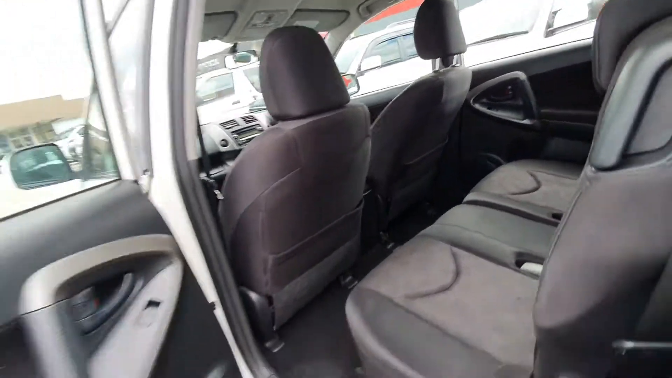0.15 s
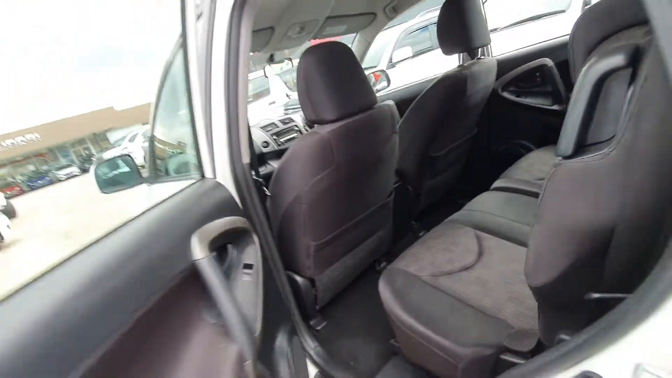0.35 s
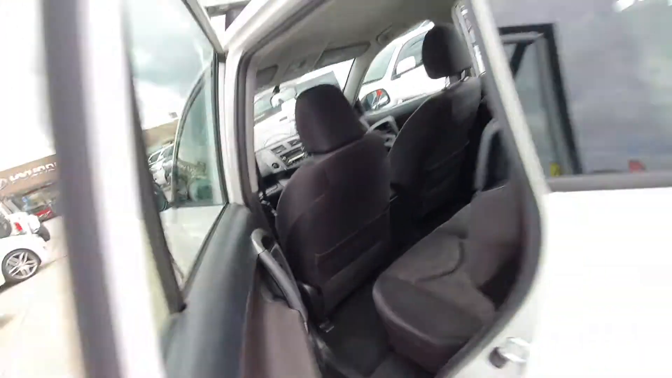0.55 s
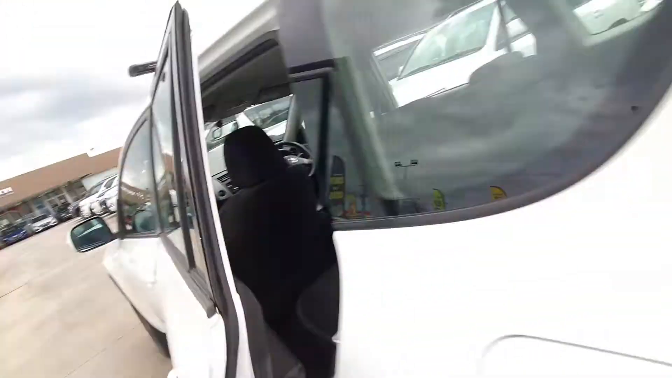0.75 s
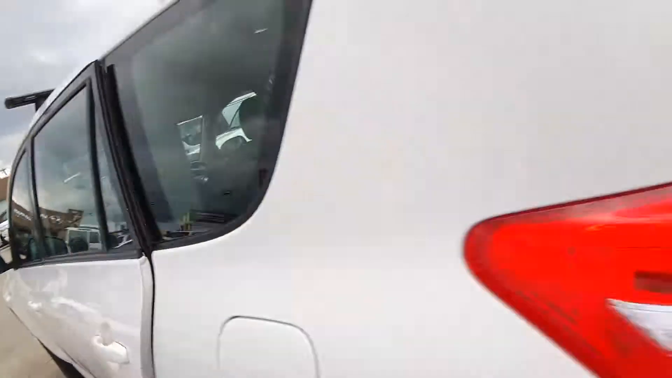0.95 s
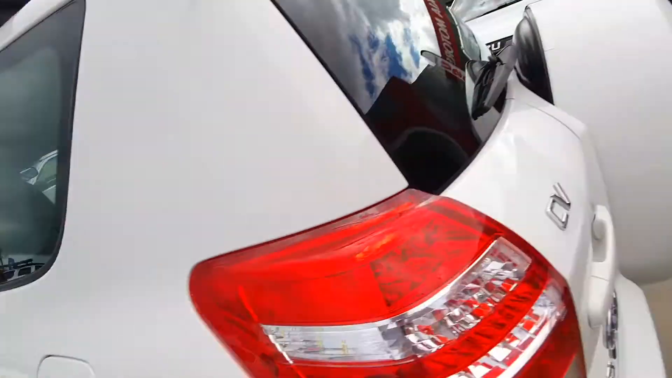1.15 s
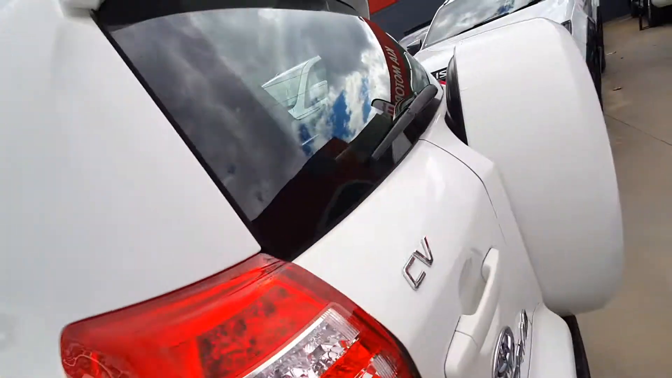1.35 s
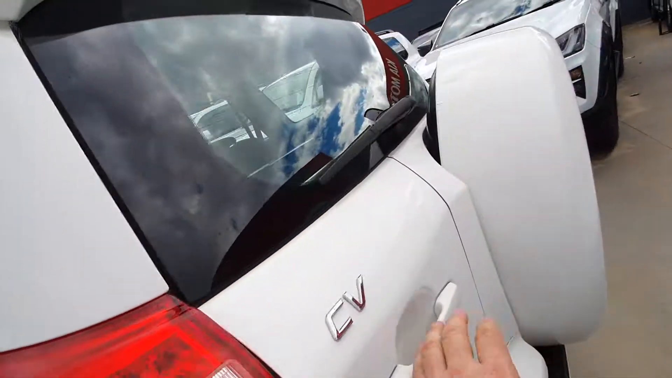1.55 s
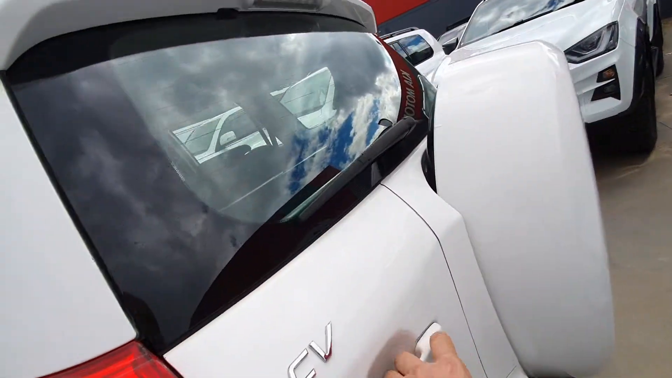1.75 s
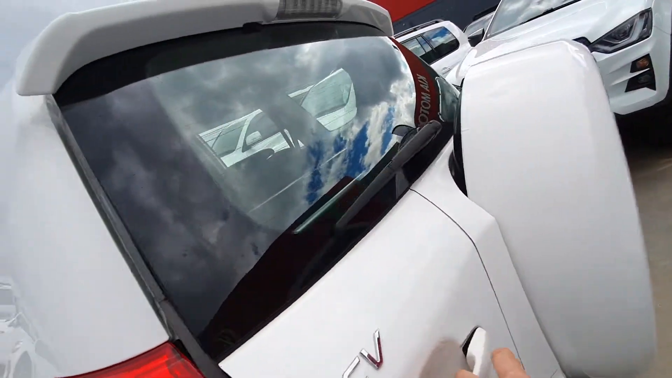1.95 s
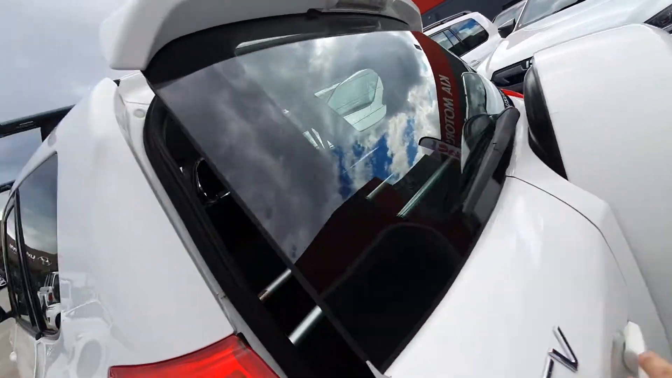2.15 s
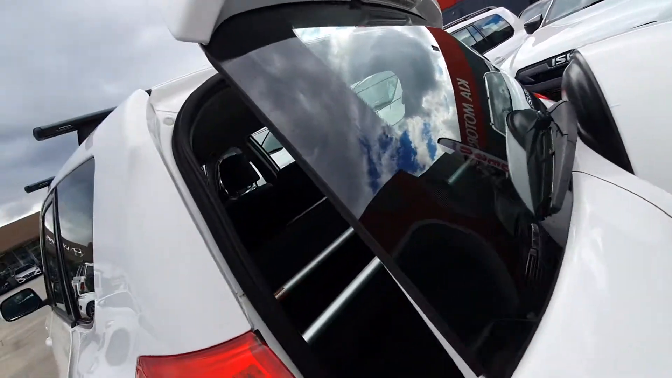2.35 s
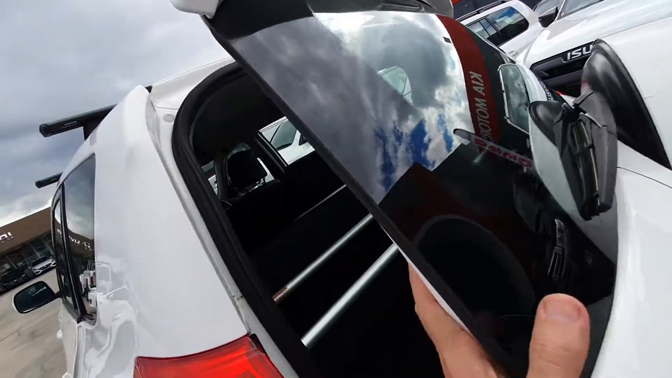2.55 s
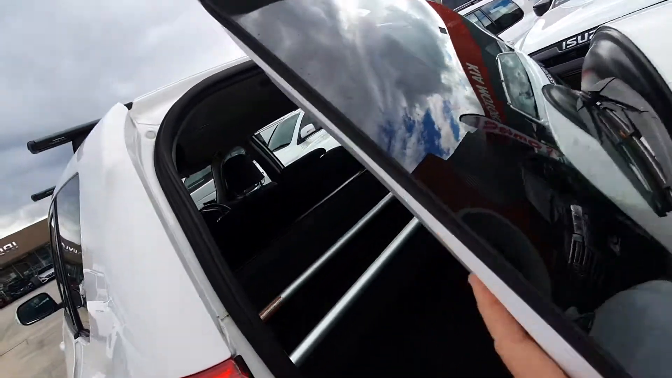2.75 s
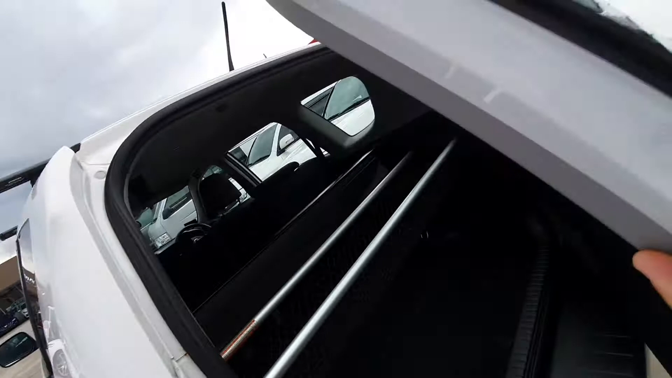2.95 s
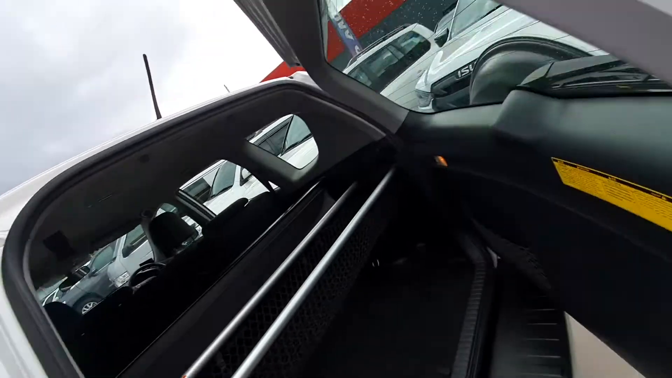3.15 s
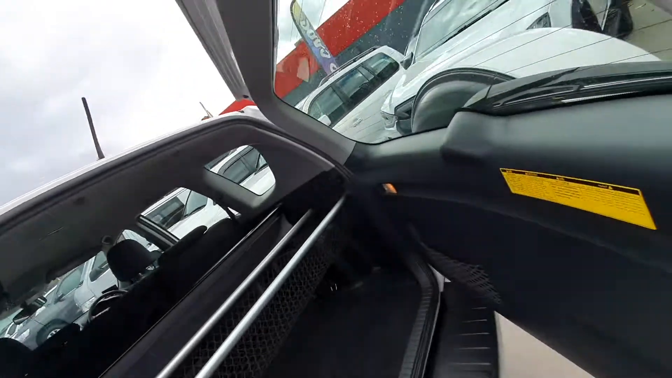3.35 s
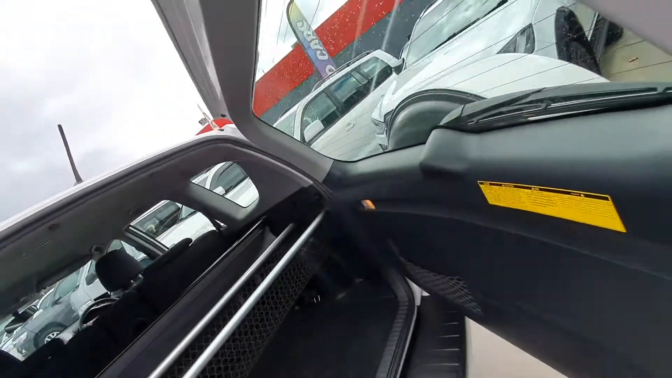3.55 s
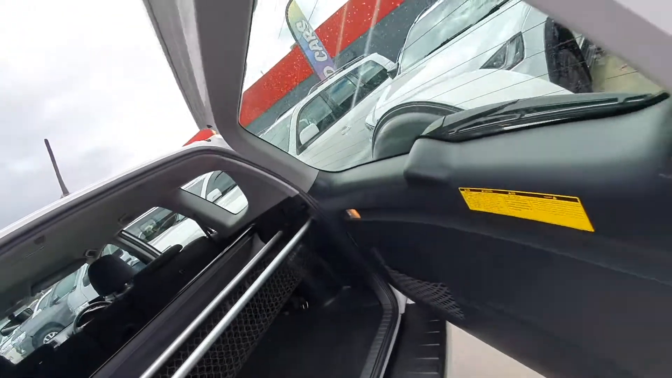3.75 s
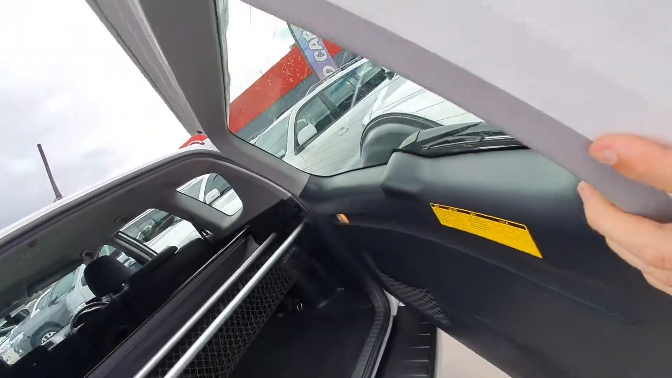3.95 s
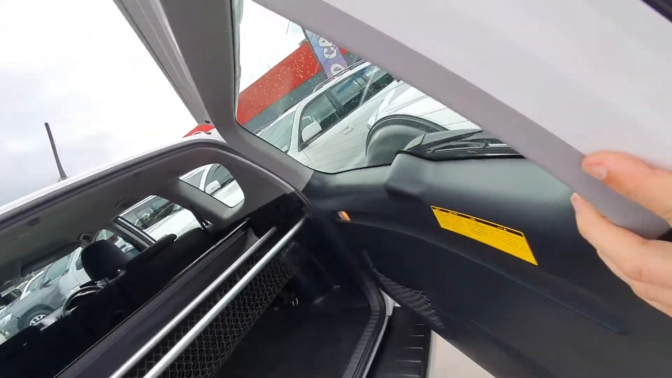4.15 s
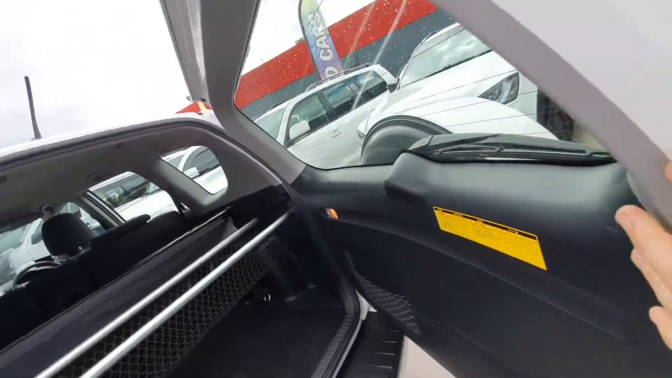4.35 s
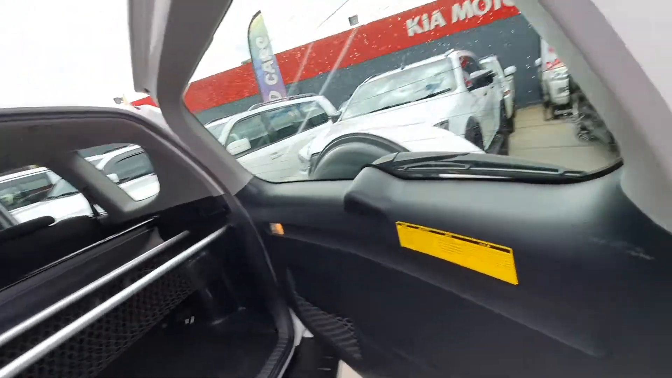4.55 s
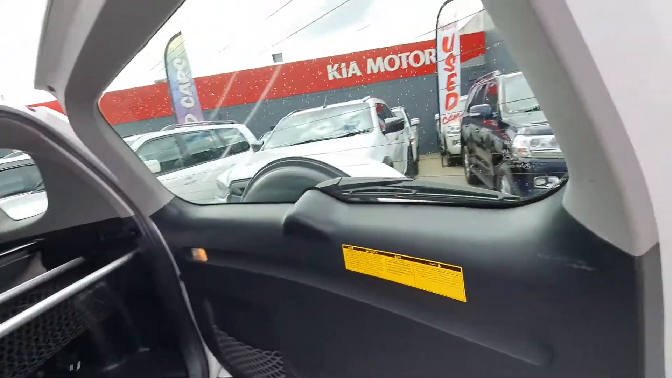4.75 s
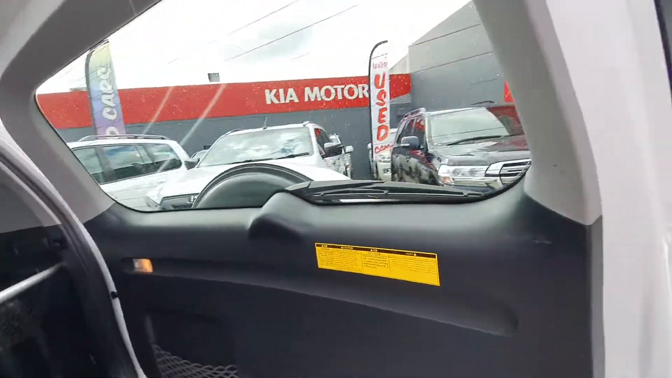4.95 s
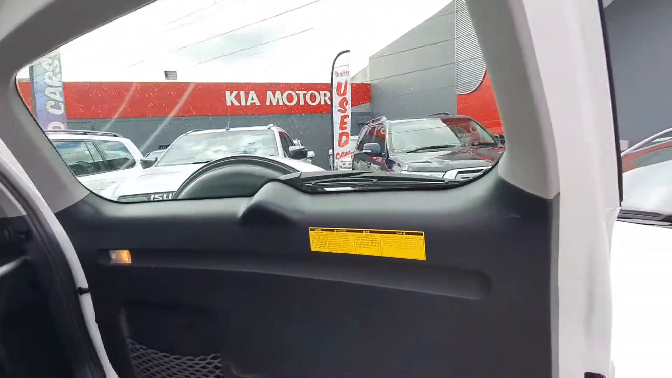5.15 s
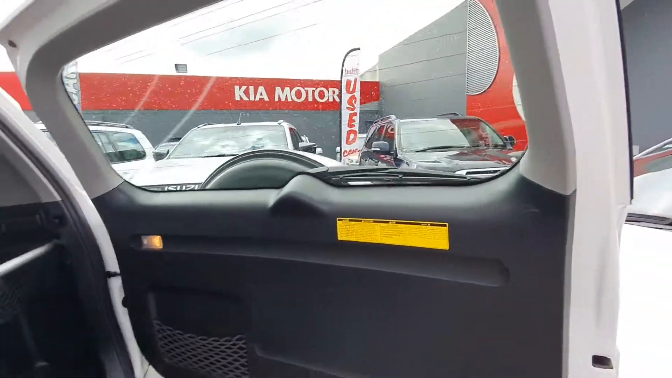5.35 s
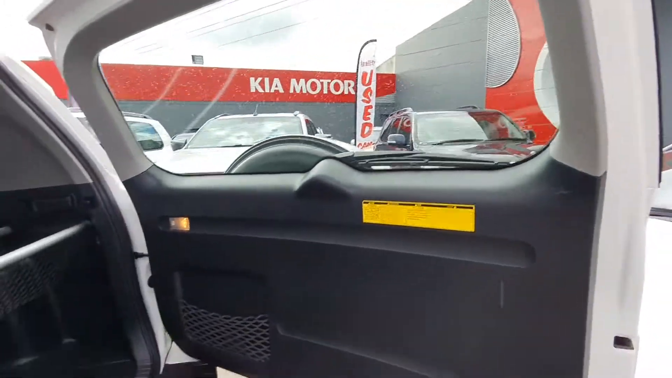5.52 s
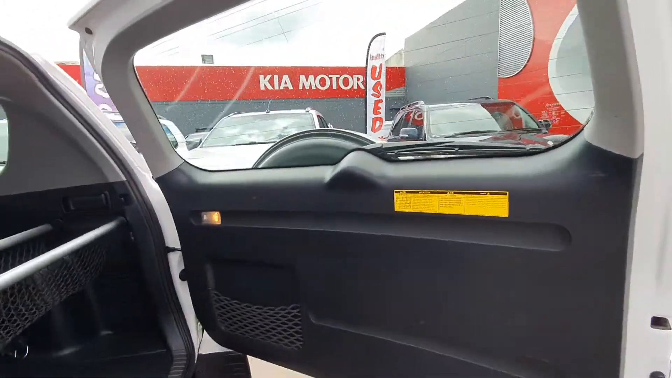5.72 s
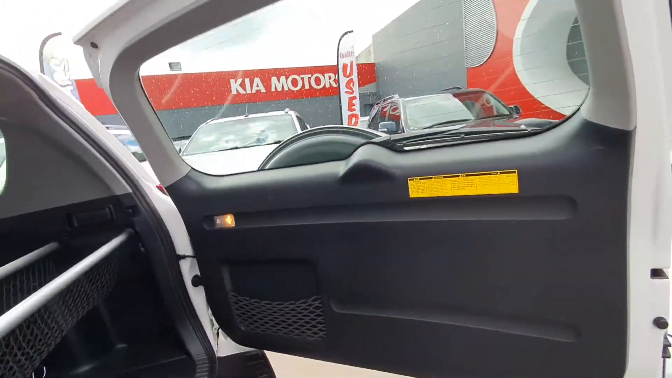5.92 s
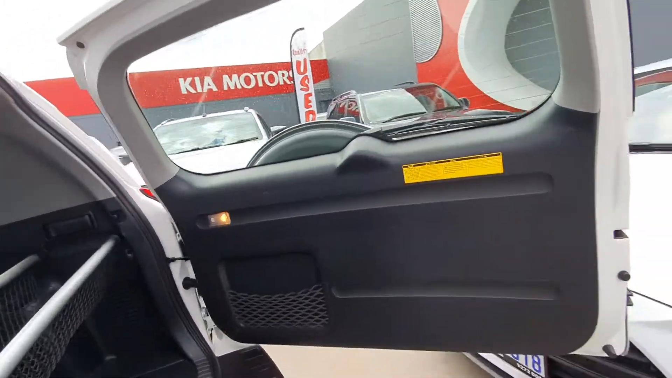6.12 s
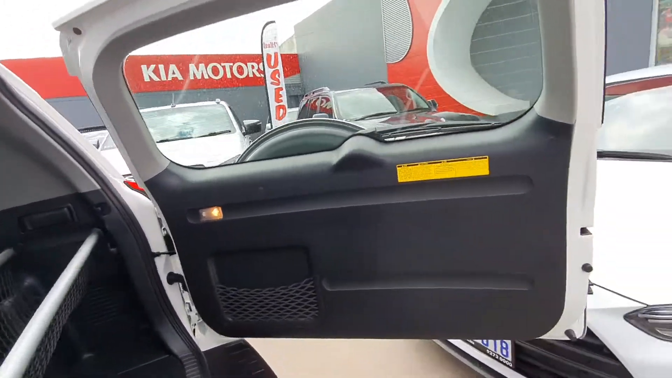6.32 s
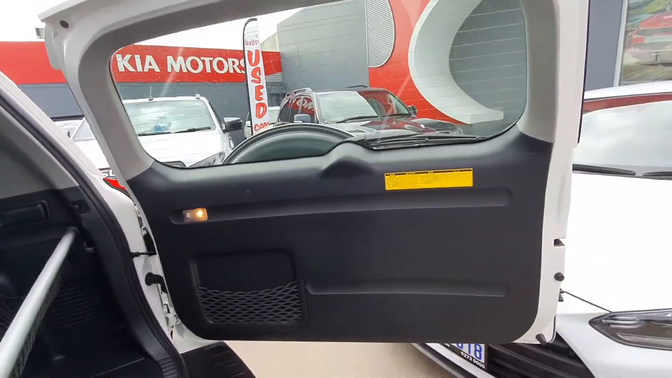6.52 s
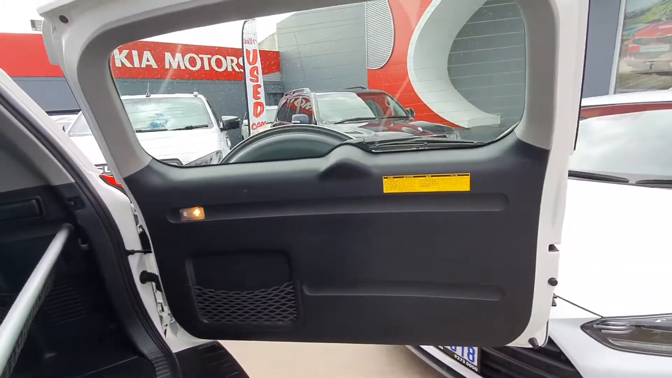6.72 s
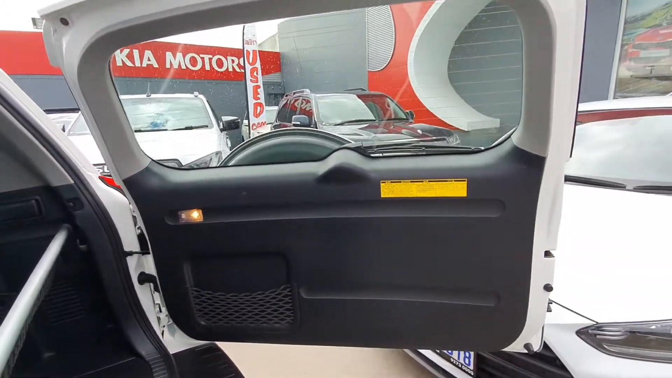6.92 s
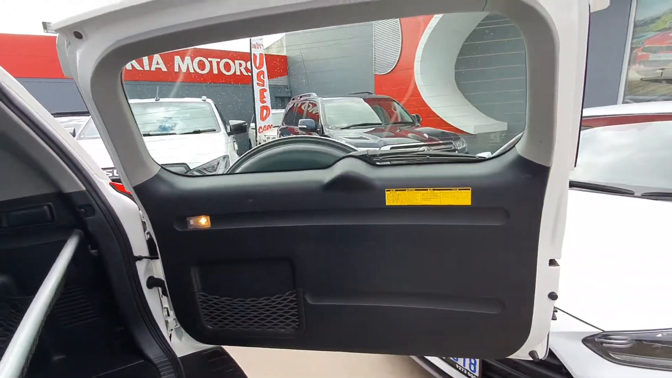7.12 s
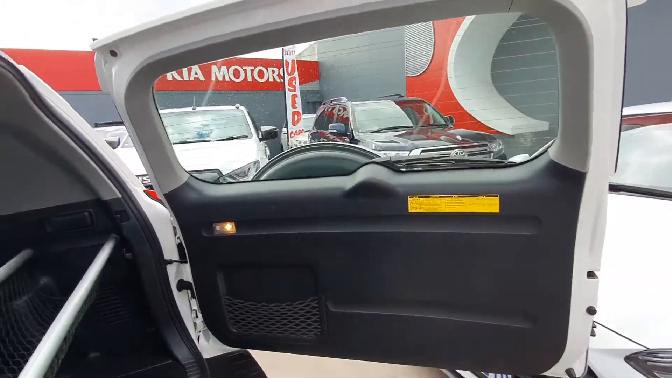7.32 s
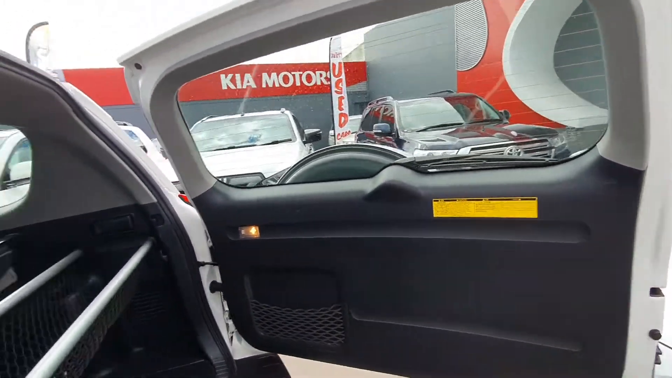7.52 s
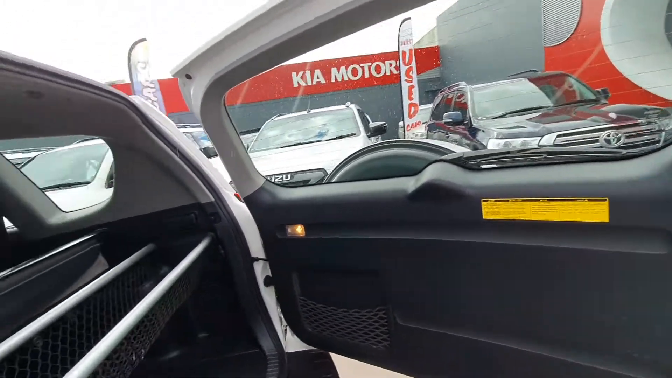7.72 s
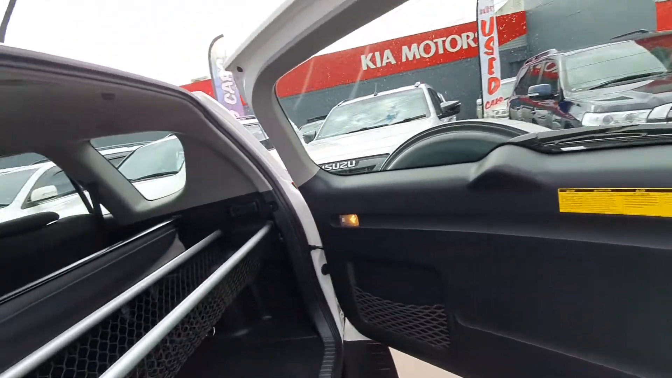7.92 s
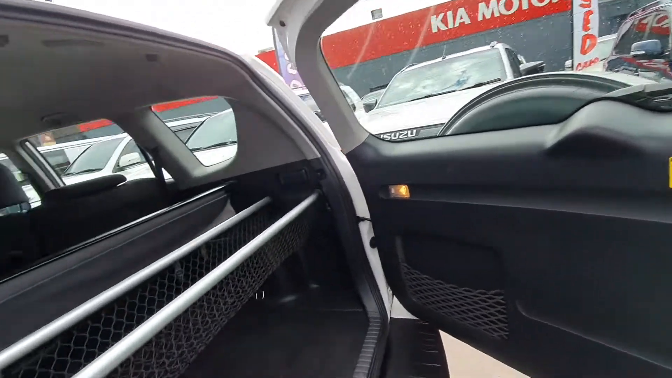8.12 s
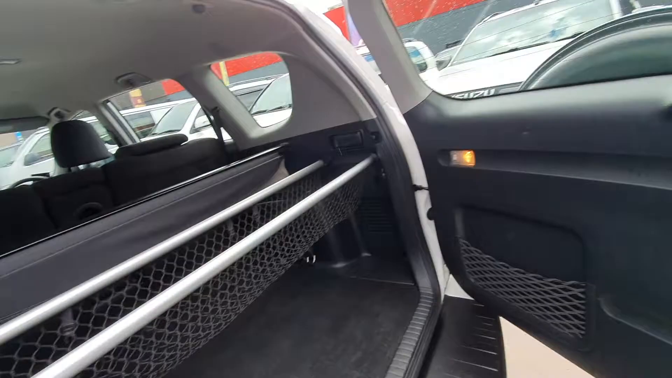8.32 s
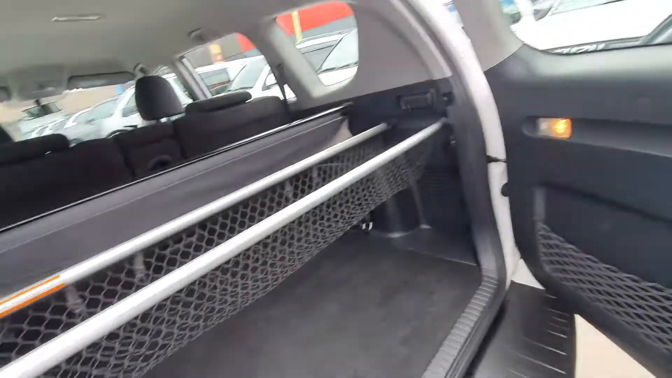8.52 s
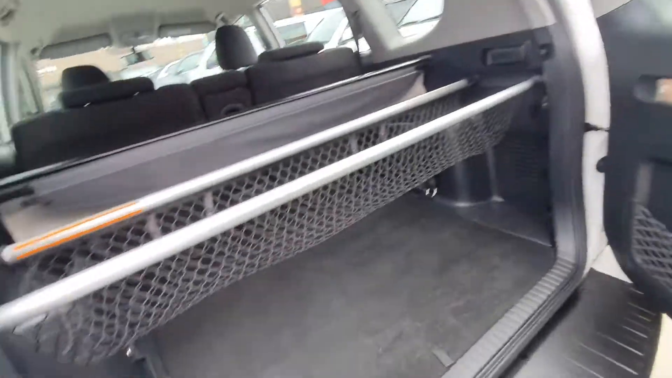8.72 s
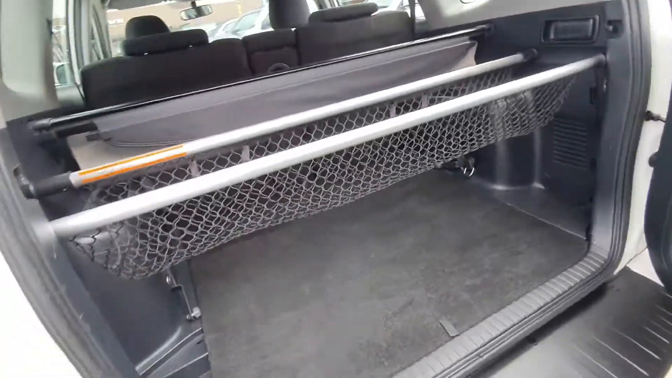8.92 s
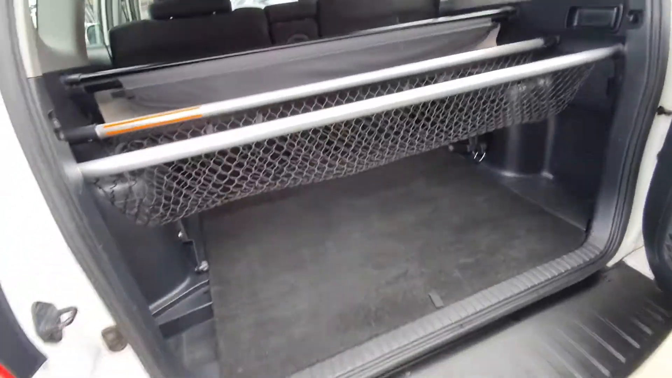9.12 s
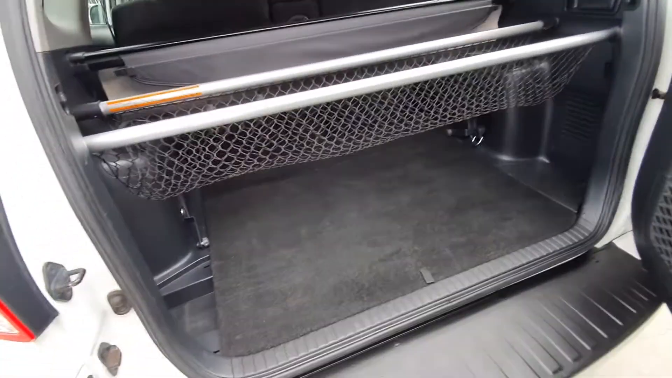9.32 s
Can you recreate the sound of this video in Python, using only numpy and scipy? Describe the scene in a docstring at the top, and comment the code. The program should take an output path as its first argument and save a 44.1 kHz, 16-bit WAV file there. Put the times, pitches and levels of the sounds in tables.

```python
"""Car doors and a tailgate on an open lot

A side door is pushed shut, then a tailgate is unlatched and swung open; another door close by is
opened and slammed. Struck panels are modal resonators over a noise crash, and closing doors boom their cabins.
Shoes and sleeves are shaped friction noise; idling engines and a cooling fan are wavering sines.
Far traffic is banded noise, and the recorder's gain ducks under the loudest blows."""
import sys
import numpy as np
from scipy import signal
from scipy.io import wavfile
from scipy.ndimage import uniform_filter1d

SR = 44100
rng = np.random.default_rng(int(sys.argv[2]) if len(sys.argv) > 2 else 0)


def master(y):
    """Save y as 16-bit WAV."""
    cut = np.clip(np.atleast_2d(y).T, -1, 1)
    pcm = np.round(cut * 32767)  # scale
    wavfile.write(sys.argv[1], SR, pcm.astype(np.int16))


N = 413216
TIME = np.arange(N) / SR   # seconds
EDGES = 22 * 2 ** np.arange(0, 9.6, .5)   # half-octave band edges, Hz


def from_db(db):
    """Logarithmic level: decibels to an amplitude gain."""
    return 10 ** (np.asarray(db) / 20)


def rms_one(x):
    """Power normalisation: scale to rms 1."""
    return x / np.sqrt(np.mean(x ** 2) + 1e-20)


def level_at_times(rows):
    """Linear interpolation: a level curve read at every sample."""
    s, db = np.transpose(rows)
    return np.interp(TIME, s, db)


def at_hz(points, hz):
    """Logarithmic pitch: a spectrum interpolated on a log-frequency axis."""
    table_hz, values = np.transpose(points)
    return np.interp(np.log(hz), np.log(table_hz), values)


def add(out, s, sound):
    """Superposition: mix a stereo sound in at s seconds."""
    start = max(round(s * SR), 0)
    out[:, start:start + sound.shape[1]] += sound[:, :N - start]


def drift(count, size=N):
    """Random modulation: joined Gaussian knots, count a second, around 0 with spread 1."""
    knots = rng.standard_normal(size * count // SR + 2)
    return np.interp(np.arange(size) * count / SR, np.arange(len(knots)), knots)


def panned(db):
    """Intensity stereo: left and right gains for a left minus right level in dB."""
    return from_db(np.array([[db], [-db]]) / 2)


def resonance(x, hz, width):
    """Damped resonator: a two-pole band-pass with gain 1 at its peak; hz and width in Hz."""
    r = np.exp(-np.pi * width / SR)
    gain = (1 - r * r) / 2
    return signal.lfilter(gain * np.array([1, 0, -1]), [1, -2 * r * np.cos(2 * np.pi * hz / SR), r * r], x)


# Likeness of the two channels. Each row: frequency in Hz, left-right correlation.
CHANNEL_LIKENESS = [(30, 0.8), (200, 0.95), (400, 0.52), (700, 0.29), (1200, -0.23), (2500, 0.062),
                    (15000, -0.12)]
# Stereo balance of the noise. Each row: frequency in Hz, left minus right level in dB.
NOISE_BALANCE = [(60, -3), (250, -0.5), (600, -1.5), (1200, -3.5), (2200, 3), (4000, -1), (8000, 2.8),
                 (14000, -5.5)]


def noise_bands(size, balance=NOISE_BALANCE):
    """Partial coherence: half-octave noise bands, alike left and right mainly in the bass."""
    run_in = SR // 10   # lets the filters settle
    white = rng.standard_normal((2, 2, size + run_in))
    for k, (low, high) in enumerate(zip(EDGES, EDGES[1:])):
        band_pass = signal.butter(2, [low, high], "band", fs=SR, output="sos")
        mid, side = signal.sosfilt(band_pass, white[k % 2])[:, run_in:]   # neighbours use separate noise
        hz = np.sqrt(low * high)
        alike = np.clip(at_hz(CHANNEL_LIKENESS, hz), -1, 1)
        pair = np.sqrt(1 + alike) * mid + np.sqrt(1 - alike) * np.array([side, -side])
        yield hz, rms_one(pair) * panned(at_hz(balance, hz))


# Spectrum of the far traffic. Each row: frequency in Hz, relative density in dB per Hz.
TRAFFIC_SPECTRUM = [(220, -9), (350, -11), (460, -10.5), (600, -12), (800, -18), (1000, -13.5),
                    (1500, -19.5), (2200, -27.5), (3000, -31.5), (4000, -37.5), (5300, -40.5), (8000, -53),
                    (15000, -67)]


def far_traffic(start_db=-40, fade_db_per_s=0.4947):
    """Incoherent sources: broadband noise that slowly thins out."""
    return TRAFFIC_SPECTRUM, from_db(start_db - fade_db_per_s * TIME)


# Spectrum of the rumble. Each row: frequency in Hz, relative density in dB per Hz.
RUMBLE_SPECTRUM = [(22, -2), (31, 15), (42, 0), (55, 0), (80, 11.5), (110, -10.5), (160, 1), (220, -20),
                   (350, -29)]


def steady_rumble(rumble_db=-36.5):
    """Stationary noise: a low rumble of constant mean level."""
    return RUMBLE_SPECTRUM, from_db(rumble_db)


# Spectrum of the passing vehicle. Each row: frequency in Hz, relative density in dB per Hz.
SWISH_SPECTRUM = [(1100, -13.5), (1700, 20), (2400, 11.5), (3300, -23)]


def passing_vehicle(nearest_s=5, nearest_db=-52, half_s=0.25):
    """Inverse distance law: a far swish is 3 dB down half_s seconds either side of its nearest point."""
    return SWISH_SPECTRUM, from_db(nearest_db) / np.hypot(1, (TIME - nearest_s) / half_s)


# Spectrum of the cloth. Each row: frequency in Hz, relative density in dB per Hz.
CLOTH_SPECTRUM = [(1000, 0.5), (3000, 9.5), (5000, 8), (7000, -0.5), (11000, 2.5), (15000, -11.5)]
# Moves of the walker. Each row: middle in seconds, level in dB before rustle_db, half length in seconds.
WALKER_MOVES = [(0.3, -66, 1), (1.68, -71.5, 0.17), (2.348, -68, 0.41), (3.224, -65.5, 0.15),
                (3.595, -62.5, 0.22), (4.5, -67, 0.37), (5.06, -67, 0.25), (5.882, -66.5, 0.3),
                (6.484, -69, 0.23), (7.945, -70.5, 0.43), (8.653, -68, 0.28), (9.176, -68.5, 0.16)]


def clothes(rustle_db=10.0, crinkle_db=1.5):
    """Friction noise: cloth near the microphone rustles whenever the walker moves, and crinkles quickly."""
    power = sum(from_db(db) ** 2 * np.exp(-((TIME - s) / length) ** 2) for s, db, length in WALKER_MOVES)
    return CLOTH_SPECTRUM, np.sqrt(power) * from_db(rustle_db + crinkle_db * drift(count=120))


def open_air(patchy_db=1.5):
    """Power addition: the noise layers add as powers in each band, with a slow random unevenness."""
    layers = [far_traffic(), steady_rumble(), passing_vehicle(), clothes()]
    centres = np.sqrt(EDGES[1:] * EDGES[:-1])
    shares = []
    for spectrum, _ in layers:
        inside = (centres > spectrum[0][0] / np.sqrt(2)) & (centres < spectrum[-1][0] * np.sqrt(2))
        share = from_db(at_hz(spectrum, centres)) * np.sqrt(centres) * inside   # bandwidth grows with pitch
        shares.append(share / np.linalg.norm(share))
    out = np.zeros((2, N))
    for k, (hz, band) in enumerate(noise_bands(N)):
        power = sum((share[k] * level) ** 2 for share, (_, level) in zip(shares, layers))
        out += np.sqrt(power) * from_db(patchy_db * drift(count=10)) * band
    return out


def tone(hz, db, waver, lag_ms=-0.2, pan_db=-1.0):
    """Phase modulation: a machine tone whose phase wavers (radians) with the load; db is its rms level."""
    phase = 2 * np.pi * (np.cumsum(hz * np.ones(N)) / SR + rng.random()) + waver * drift(count=5)
    apart = np.pi * hz * lag_ms / 10 ** 3   # half the delay between the channels, as phase
    return np.sqrt(2) * from_db(db) * panned(pan_db) * np.array([np.sin(phase - apart), np.sin(phase + apart)])


# Faint steady whines of other machines. Each row: frequency in Hz, mean level in dB.
MACHINE_WHINES = [(549, -57.5), (710, -64.5), (748, -61)]


def whines():
    """Tonal machine noise: faint sines whose levels drift by chance."""
    return sum(tone(hz, db + 3 * drift(count=3), waver=1.5) for hz, db in MACHINE_WHINES)


# Orders of an idling four-cylinder engine. Each row: multiple of the firing rate, mean level in dB.
ENGINE_ORDERS = [(1, -45), (1.5, -64), (2, -45.5), (2.5, -52), (3, -41.5), (4, -60), (5, -45), (6, -59.5)]


def idling_engine(firing_hz=27.44, unsteady_db=1.0):
    """Engine orders: periodic firing sounds at whole and half multiples of its rate."""
    return sum(tone(k * firing_hz, db + unsteady_db * drift(count=4), waver=0.25) for k, db in ENGINE_ORDERS)


# Level of the drone along the walk. Each row: time in seconds, level in dB.
DRONE_LEVEL = [(0, -32.5), (0.9, -32.5), (1.6, -24.5), (2.14, -23.5), (2.28, -38), (2.45, -22), (2.63, -31),
               (2.82, -23), (3.35, -28), (3.65, -36.5), (4.2, -32), (6.2, -40.5), (8.2, -36.5), (8.7, -59),
               (9.37, -35)]


def exhaust_drone(start_hz=72.36, sag_hz_per_s=0.68, step_at_s=7.9, step_hz=7.1, step_s=0.19):
    """Speed-locked pitch: the drone sinks as that engine settles, then steps up."""
    step = step_hz * np.clip((TIME - step_at_s) / step_s, 0, 1)
    return tone(start_hz - sag_hz_per_s * TIME + step, level_at_times(DRONE_LEVEL), waver=0.075)


# Blade tone along the walk. Each row: time in seconds, level in dB before lift_db.
BLADE_LEVEL = [(0, -36), (0.95, -36), (1.45, -52), (2.7, -51.5), (3.15, -43.5), (5.5, -43), (6.4, -55.5),
               (7.4, -49), (8.6, -43), (9.37, -44)]
# Octave of the blade tone. Each row: time in seconds, level in dB.
BLADE_OCTAVE_LEVEL = [(0, -44), (0.55, -49.5), (1.05, -42), (1.7, -51.5), (2.6, -49.5), (3.0, -45.5),
                      (3.4, -50.5), (4.7, -49.5), (5.7, -43.5), (6.7, -59), (8.6, -47), (9.37, -54.5)]


def cooling_fan(blade_hz=177.1, lift_db=1.0):
    """Blade passing: a tone at the blade rate, with its octave wavering more."""
    blade = tone(blade_hz, level_at_times(BLADE_LEVEL) + lift_db, waver=0.19)
    octave = tone(2 * blade_hz, level_at_times(BLADE_OCTAVE_LEVEL), waver=0.98)
    return blade + octave


# Shoes on the ground. Each row: middle in seconds, level in dB, half length in seconds,
# tilt in dB per octave, pitch of the scrape in Hz.
SHOE_SCUFFS = [(0.886, -47, 0.033, -3, 11000), (1.962, -48.5, 0.029, -0.5, 13000),
               (3.57, -46.5, 0.016, 5, 13000), (5.16, -56, 0.019, 5, 11500), (5.372, -30.5, 0.017, 0, 5700),
               (5.451, -47.5, 0.061, -2.5, 5700), (6.012, -43.5, 0.036, -1, 13100),
               (6.105, -52, 0.009, 6, 11000), (6.612, -43, 0.031, -5, 2860),
               (7.643, -51.5, 0.025, -2, 5000), (8.214, -54, 0.026, -2, 13000),
               (8.674, -35.5, 0.02, -2.5, 2540), (8.878, -38.5, 0.049, -0.8, 2310)]
# Colour of the rubbing. Each row: frequency in Hz, relative level in dB per half-octave band.
RUB_COLOUR = [(500, -18), (900, -6), (1500, -7.5), (2200, -8.5), (3200, -6.5), (5500, -1), (8000, -10.5),
              (11500, 9.5), (15000, -15.5)]
# Resonances of a sliding sole. Each row: frequency in Hz, width in Hz, gain in dB.
SOLE_RESONANCES = [(1360, 120, 3.5), (1540, 200, 11), (2660, 230, 1), (3160, 220, 8), (3700, 96, -1),
                   (6050, 240, -3), (11200, 1300, -4)]


def scuffs(grit_db=2.0, pivot_hz=4500, bite=3.3, scrape_width=0.19):
    """Friction excitation: gritty sliding noise bites quickly, rings in the sole and fades."""
    out, size = np.zeros((2, N)), SR // 4
    t = (np.arange(size) - size / 2) / SR
    bands = list(noise_bands(size * 4))
    for s, db, length, tilt_db, scrape_hz in SHOE_SCUFFS:
        start = rng.integers(size * 3)   # a fresh stretch of noise
        rub = np.zeros((2, size))
        for hz, band in bands:
            if hz > RUB_COLOUR[0][0]:
                colour_db = at_hz(RUB_COLOUR, hz) + tilt_db * np.log2(hz / pivot_hz)
                rub += from_db(colour_db) * band[:, start:start + size]
        rub = rub * from_db(grit_db * drift(count=500, size=size))
        rub = rub + sum(from_db(ring_db) * resonance(rub, hz, width) for hz, width, ring_db in SOLE_RESONANCES)
        rub = rub + resonance(rub, scrape_hz, scrape_width * scrape_hz)
        stroke = np.exp(-np.abs(t / length) ** np.where(t < 0, bite, 1.5))
        add(out, s + t[0], from_db(db) * rms_one(rub) * stroke)
    return out


# Air squeezed by a closing door. Each row: time of the peak in seconds, level of the air's swing in dB,
# frequency in Hz, half length in seconds.
CABIN_BOOMS = [(1.096, -20, 66.6, 0.017), (7.167, -1.5, 58.5, 0.017)]


def cabin_booms(sway_hz=22, sway_db=-10, sway_length=0.056):
    """Cavity resonance: trapped air swells for a few cycles while the body rocks slower on its springs."""
    out = np.zeros(N)
    for s, db, hz, length in CABIN_BOOMS:
        t = TIME - s
        air = np.cos(2 * np.pi * hz * t) * np.exp(-np.abs(t / length))
        sway = np.cos(2 * np.pi * sway_hz * t) * np.exp(-np.abs(t / sway_length))
        out -= from_db(db) * (air + from_db(sway_db) * sway)
    return out


def settling(rows, count=2, gap_s=0.008, loss_db=10.5, bass_step_db=3.5, treble_step_db=-4.5, octaves=-0.1,
             rattle_after_s=0.044, rattle_loss_db=36, rattle_hz=3050):
    """Inelastic rebound: a panel returns from its seal weaker, heavier, duller, lower; the lock rattles once."""
    for s, db, bass_db, treble_db, spot_hz in rows:
        for k in range(count + 1):
            yield (s + k * gap_s, db - k * loss_db, bass_db + k * bass_step_db,
                   treble_db + k * treble_step_db, spot_hz * 2 ** (k * octaves))
        yield s + rattle_after_s, db - rattle_loss_db, 0, 0, rattle_hz


# Decay of the crash. Each row: frequency in Hz, time to fall by 60 dB in seconds.
CRASH_DECAY = [(80, 0.16), (400, 0.14), (1500, 0.069), (3200, 0.057), (5200, 0.042), (15000, 0.012)]
# Stereo balance of struck panels. Each row: frequency in Hz, left minus right level in dB.
STRUCK_BALANCE = [(60, 1), (600, -1), (1250, -1), (2300, 5.5), (4400, -0.5), (8000, -9), (14000, 1)]


def blows(rows, modes, crash, lag_ms, tail_db, tail_t60, knock_db, crack_db, ring_db, spot_db=11.0,
          spot_octaves=0.4, knock_cycles=44.0, crack_t60=0.011, rise_s=0.00027, bass_hz=280,
          treble_hz=2200, scatter_db=-4.0, rattle_db=4.0):
    """Modal excitation: a contact cracks, knocks and rings panel modes over a crash with an outdoor tail."""
    out, t = np.zeros((2, N)), np.arange(SR * 2 // 5) / SR
    lag_s = np.array([[max(lag_ms, 0)], [max(-lag_ms, 0)]]) / 10 ** 3
    age = np.maximum(t - lag_s, 0)   # one channel hears it first
    bands = list(noise_bands(len(t) * 2, STRUCK_BALANCE))
    crack = from_db(crack_db - 60 * age / crack_t60)
    tail = from_db(tail_db - 60 * age / tail_t60)
    fades = [from_db(-60 * age / at_hz(CRASH_DECAY, hz)) + tail + crack * hz / (hz + treble_hz)
             for hz, _ in bands]
    rings = []
    for k, (hz, _, t60) in enumerate(modes):
        swing = (-1) ** k * np.sin(2 * np.pi * hz * age)   # neighbouring modes start in opposite sense
        rings.append(swing * from_db(-60 * age / t60) * panned(at_hz(STRUCK_BALANCE, hz)))
    for s, db, bass_db, treble_db, spot_hz in rows:
        def force(hz):
            """Contact spectrum: mass drives the bass, hardness the treble, the spot its nearby modes."""
            near = np.exp(-(np.log2(hz / spot_hz) / spot_octaves) ** 2)
            bass = bass_db / (1 + (hz / bass_hz) ** 4)
            treble = treble_db / (1 + (treble_hz / hz) ** 4)
            return from_db(db + spot_db * near + bass + treble)
        start = rng.integers(len(t))   # a fresh stretch of noise
        hit = np.zeros((2, len(t)))
        for (hz, band), fade in zip(bands, fades):
            hit += force(hz) * from_db(at_hz(crash, hz)) * fade * band[:, start:start + len(t)]
        hit = hit * from_db(rattle_db * drift(count=400, size=len(t)))   # loose parts chatter
        for (hz, mode_db, _), ring in zip(modes, rings):
            hit = hit + force(hz) * from_db(ring_db + mode_db + scatter_db * rng.standard_normal()) * ring
        cycles = spot_hz * age
        knock_fade = from_db(knock_db - 60 * cycles / knock_cycles)
        knock = np.cos(2 * np.pi * cycles) * (1 - np.exp(-2 * cycles)) * knock_fade
        rise = 1 - np.exp(-age * from_db(treble_db) / rise_s)   # soft contacts build up more slowly
        add(out, s, (hit + force(spot_hz) * knock) * rise)
    return out


# Tailgate handle, latch and stay. Each row: start in seconds, level in dB before the colouring,
# extra bass in dB, extra treble in dB, pitch of the struck spot in Hz.
TAILGATE_CONTACTS = [(1.496, -55, -5, 6, 2970), (1.680, -58, 6, 9, 5800), (1.750, -32, 10, -13, 610),
                     (1.759, -25.5, 11.5, -7, 800), (1.766, -25.5, -10, 4.5, 685),
                     (1.790, -11.5, -18, -23, 600), (1.795, -8.5, 5.5, 3.5, 1134), (2.147, -10, 1, 2, 1235),
                     (2.482, -26.5, 5.5, -6.5, 1270), (3.720, -39.5, -2, -8, 2550),
                     (3.740, -44, 4, 13.5, 1520), (3.747, -30.5, 3, -16, 312)]
# Modes of the tailgate. Each row: frequency in Hz, relative level in dB, time to fall by 60 dB in seconds.
TAILGATE_PANEL = [(153, -5.5, 0.09), (205, -8, .12), (260, -8.5, 0.1), (676, -7, 0.085), (745, -6, 0.059),
                  (1160, -16, 0.065), (1183, -2, 0.042), (1454, -13, .1), (1526, -23, 0.14),
                  (1740, -15, 0.11), (2260, -18, 0.11), (2560, -27, .13), (3020, -25, .14),
                  (3350, -33, .14), (3880, -32, 0.091)]
# Crash of its trim and lock parts. Each row: frequency in Hz, relative level in dB per half octave.
TAILGATE_TRIM = [(80, -29.5), (150, -10), (300, -12.5), (500, -10), (1000, -14), (2000, -12.5), (3200, -11),
                 (4800, -25.5), (7000, -24.5), (14000, -34.5)]


def tailgate():
    """Impact on a damped panel: handle, latch and stay ring short modes under a strong crack."""
    return blows(settling(TAILGATE_CONTACTS), TAILGATE_PANEL, TAILGATE_TRIM, lag_ms=0.22, tail_db=-19.5,
                 tail_t60=0.25, knock_db=-8.0, crack_db=14.0, ring_db=-0.5)


# Side doors touch, latch and unlatch. Each row: start in seconds, level in dB before the colouring,
# extra bass in dB, extra treble in dB, pitch of the struck spot in Hz.
DOOR_CONTACTS = [(0.959, -21.5, -18, -7.5, 770), (0.987, -29.5, 5.5, 13.5, 840),
                 (1.074, -33.5, 10, -6, 3050), (6.385, -35, -11, -6, 598), (6.423, -25.5, -23, -8, 648),
                 (6.436, -36, 10, -3, 3500), (6.595, -29.5, -3, -12, 2840), (7.069, -15.5, -21, -14, 708),
                 (7.088, -14, -7, -1, 697), (7.093, -19, -3, -9, 372), (7.097, -15, 8.5, 3, 1270),
                 (7.124, -32, 13.5, -4, 1750)]
# Modes of a door. Each row: frequency in Hz, relative level in dB, time to fall by 60 dB in seconds.
DOOR_PANEL = [(150, -11, 0.46), (237, -18, 0.25), (292, -9, 0.43), (393, 1.5, 0.048), (506, -8, 0.083),
              (618, -8, 0.054), (754, -18, 0.1), (1174, -12.5, 0.14), (1332, -10.5, 0.086),
              (1640, -8, 0.12), (2980, -36, .12), (3070, -25.5, 0.13), (3420, -27, 0.081)]
# Crash of its trim and lock parts. Each row: frequency in Hz, relative level in dB per half octave.
DOOR_TRIM = [(80, -12.5), (200, -8.5), (600, -11.5), (1000, -20), (2000, -16), (3300, -18.5), (6000, -34),
             (14000, -40.5)]


def side_doors():
    """Impact on a resonant panel: touches and latches ring long low modes under a mild crack."""
    return blows(settling(DOOR_CONTACTS), DOOR_PANEL, DOOR_TRIM, lag_ms=-0.27, tail_db=-14,
                 tail_t60=0.37, knock_db=-6.0, crack_db=0.5, ring_db=-3.5)


def scene():
    """Superposition: doors and footwork in front of the hum of the lot."""
    machines = whines() + idling_engine() + exhaust_drone() + cooling_fan()
    return open_air() + machines + scuffs() + cabin_booms() + tailgate() + side_doors()


def record(dry, threshold_db=-7.5, release_db_per_s=5.0, ceiling=1.3, cutoff_hz=15900):
    """Gain limiting: loud blows duck the gain, which creeps back; peaks are rounded and the top is cut."""
    power = uniform_filter1d(np.mean(dry ** 2, axis=0), size=SR // 100)
    level_db = 10 * np.log10(np.abs(power) + 1e-12)
    recovery = release_db_per_s * TIME
    duck_db = np.maximum.accumulate(np.maximum(level_db - threshold_db, 0) + recovery) - recovery
    ducked = dry * from_db(-uniform_filter1d(duck_db, size=SR // 200))
    rounded = ceiling * np.tanh(ducked / ceiling)
    low_pass = signal.ellip(10, .1, 80, cutoff_hz, fs=SR, output="sos")
    return signal.sosfilt(low_pass, rounded)


dry = scene()
out = record(dry)
master(out)
```